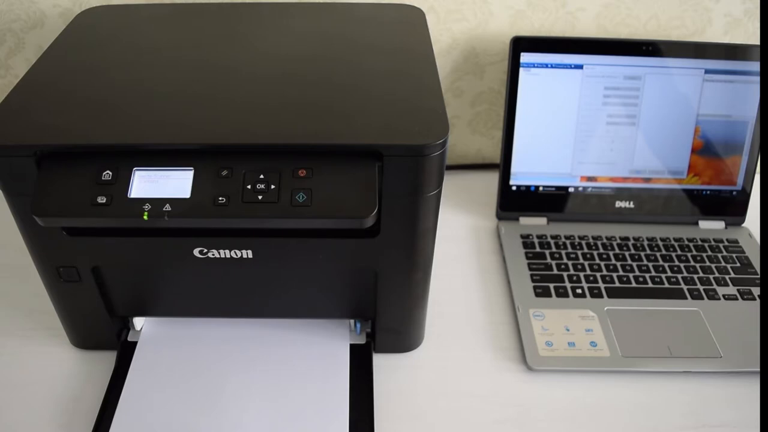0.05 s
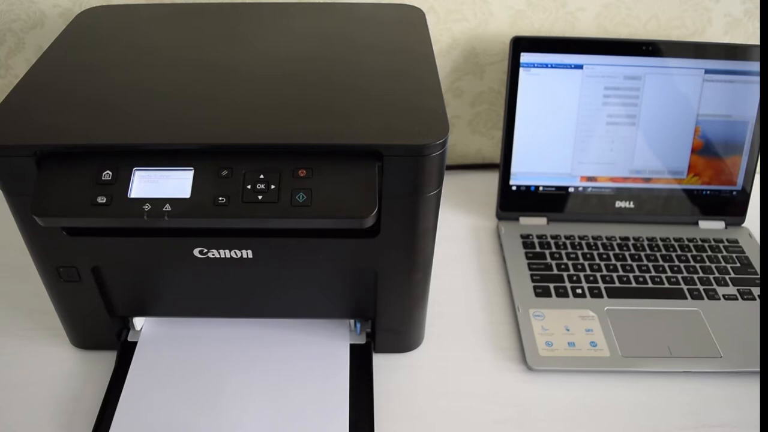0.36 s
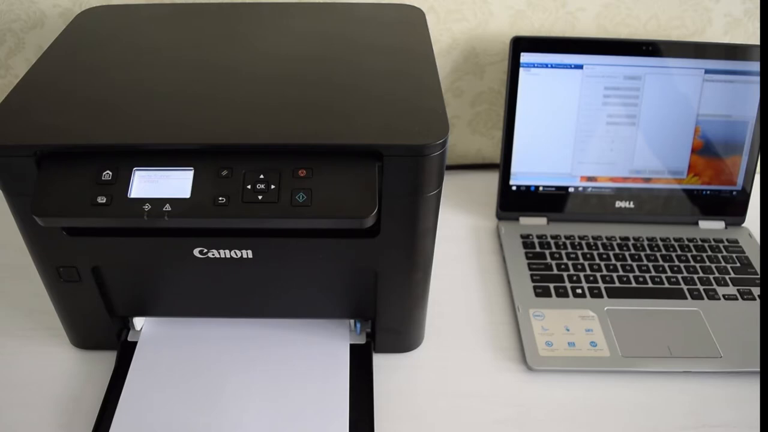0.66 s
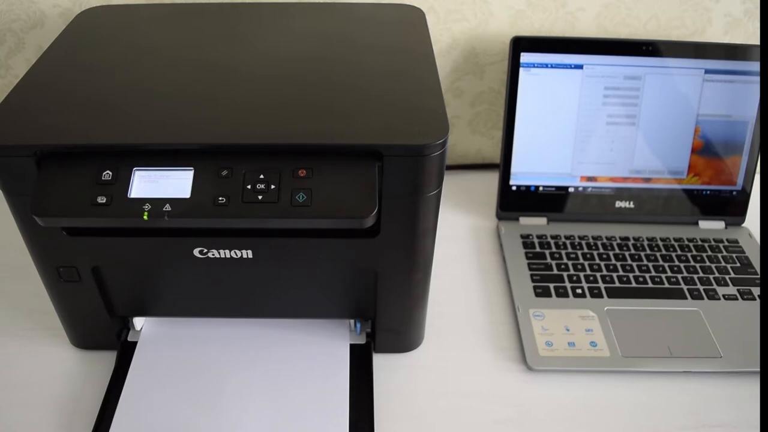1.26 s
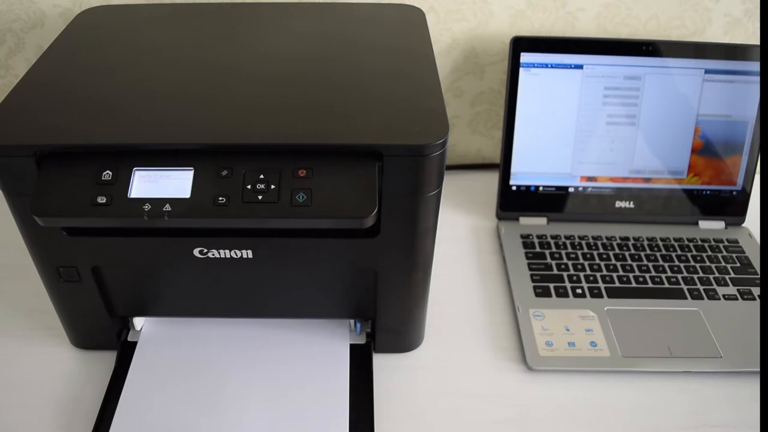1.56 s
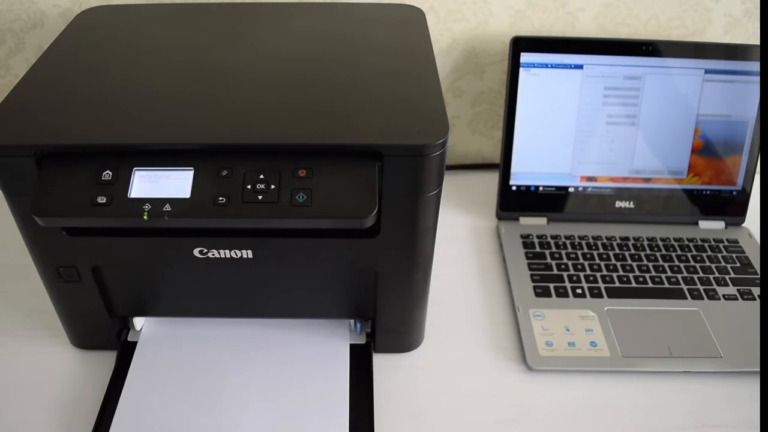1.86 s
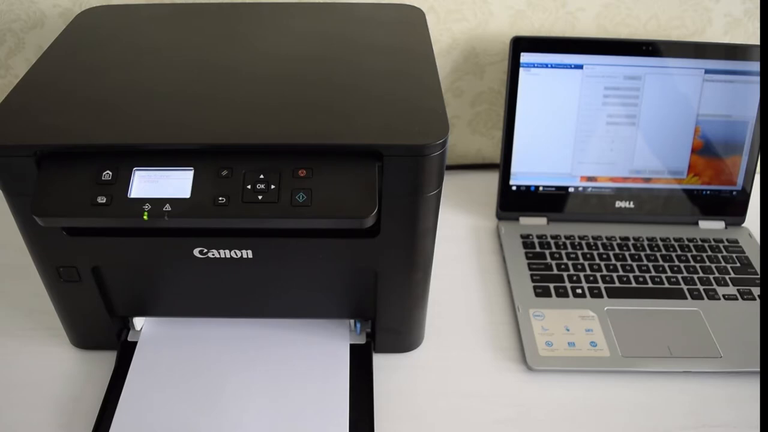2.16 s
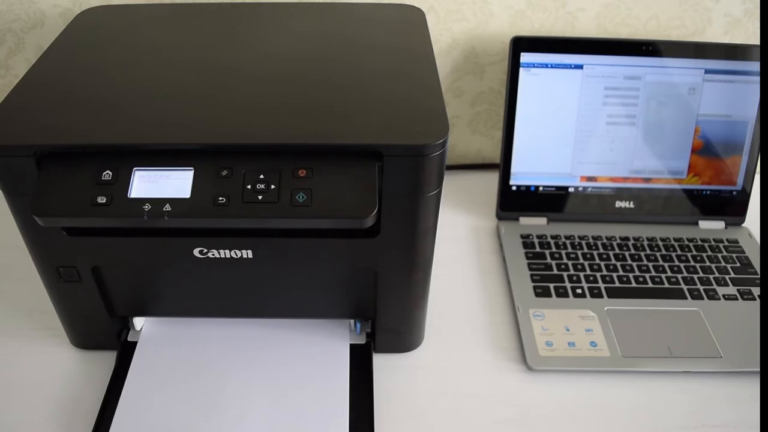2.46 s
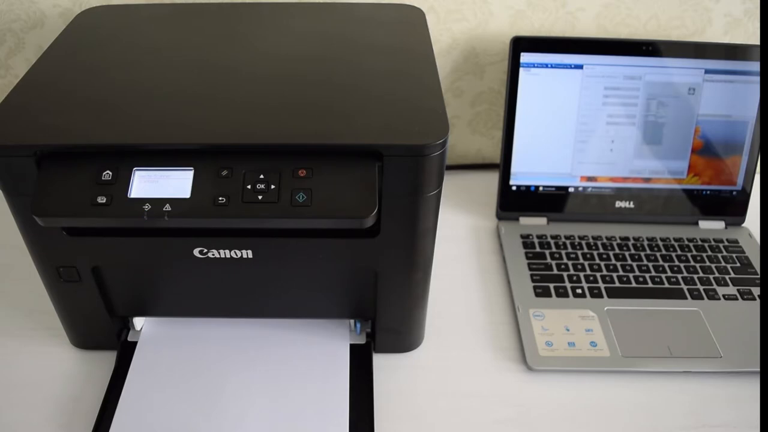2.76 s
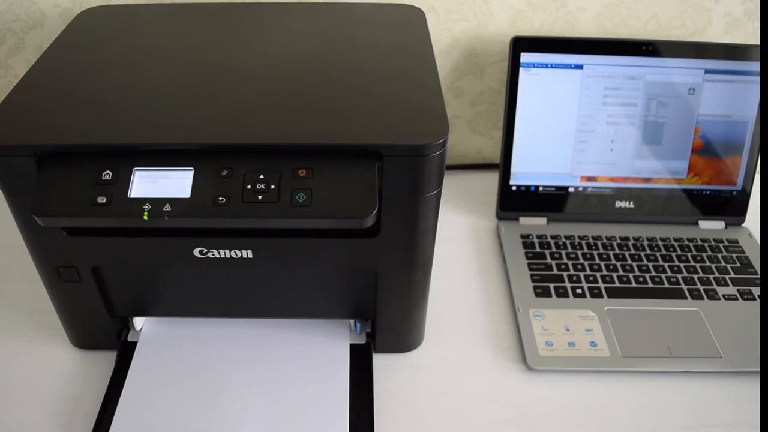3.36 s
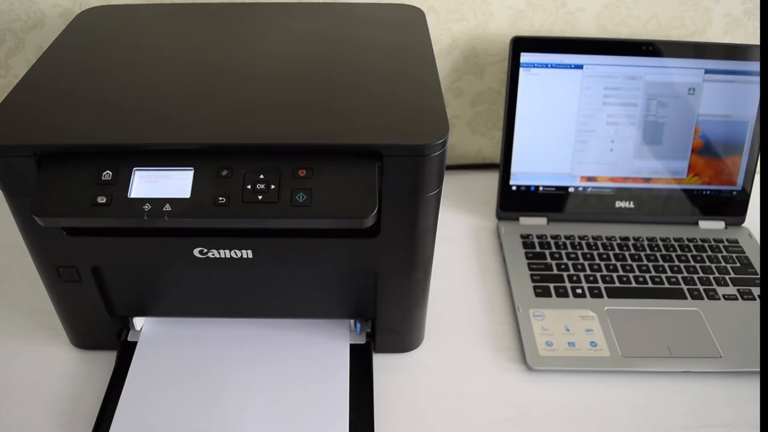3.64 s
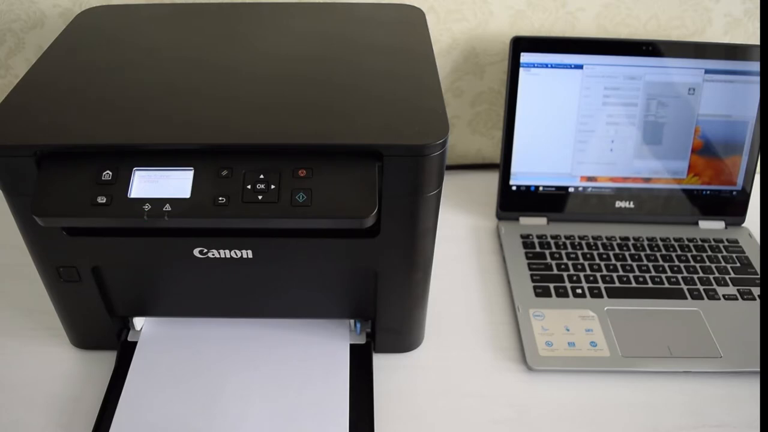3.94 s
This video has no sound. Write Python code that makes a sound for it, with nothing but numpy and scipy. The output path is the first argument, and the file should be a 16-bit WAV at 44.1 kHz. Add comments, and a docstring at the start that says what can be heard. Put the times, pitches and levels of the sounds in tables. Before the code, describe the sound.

A desktop printer-scanner's motor whines, clacks, whirs fast, then hums through two slow moves.

```python
"""In a small room, a desktop printer-scanner works through a cycle. A stepper motor whines and stops
with a clack. A fast run follows, its plastic gears whirring and throbbing once a turn, and winds down.
Then the motor hums through two slow moves, each begun by a knock of the drive in the plastic case.
The motor sounds at multiples of its step rate; the gears add tones and a rattle of tooth contacts."""
import sys
import numpy as np
from scipy import signal
from scipy.fft import rfft, irfft
from scipy.io import wavfile
from scipy.ndimage import map_coordinates

SR = 44100
rng = np.random.default_rng(int(sys.argv[2]) if len(sys.argv) > 2 else 0)


def store_pcm(level_fs):
    """Save levels as 16-bit WAV."""
    pcm = np.round(np.clip(level_fs, -1, 1) * 32767).astype(np.int16)
    wavfile.write(sys.argv[1], SR, np.atleast_2d(pcm).T)


N = 176400
T = np.arange(N) / SR
STEPS_PER_TURN = 127

# Motor speed, first run and fast run. Each row: time in seconds, step rate in Hz.
WHINE_STEP_HZ = [(0, 1006), (.243, 1007.5), (.262, 500.5)]
FAST_STEP_HZ = [(.385, 300), (.403, 480), (.46, 1469), (2.85, 1469), (2.885, 500), (2.905, 250)]
# Gear whirr early in the fast run. Each row: frequency in Hz, relative level in dB.
EARLY_WHIRR_SPECTRUM = [(100, -55), (200, -27.5), (380, -42), (450, -13.5), (540, -7), (760, -13),
                        (1050, -4.5), (1700, 1), (3300, -14), (4650, -20), (5800, -31), (8600, -29.5),
                        (11000, -40), (13500, -56)]
# Drive knocks. Each row: start in seconds, level in dB, treble gain in dB, clatter T60 in seconds.
DRIVE_KNOCKS = [(.278, -36.5, 5.5, 0.24), (.284, -38.5, -11, 0.046), (0.29, -43, -16, 0.039),
                (.377, -40, 8, 0.26), (2.891, -52, 11, 0.15), (3.018, -38, -0.5, 0.19),
                (3.462, -43.5, -20, 0.18), (3.562, -39, 4.5, 0.22), (3.703, -43, -6, .08)]
# Case modes. Each row: frequency in Hz, relative level in dB, T60 in seconds.
CASE_RESONANCES = [(514.6, -7, 0.38), (1087, 7, 0.21)]


def from_db(db):
    """Decibels to gain."""
    return 10 ** (np.asarray(db) / 20)


def unit_rms(x):
    """Scale to unit power."""
    return x / np.sqrt(np.mean(x ** 2) + 1e-20)


def curve(rows):
    """Join (seconds, value) rows by straight lines."""
    return np.interp(T, *np.transpose(rows))


def gate(start_s, stop_s, attack_s, release_s):
    """Linear rise, hold, exponential fall after stop_s."""
    return np.clip((T - start_s) / attack_s, 0, 1) * np.exp(-np.maximum(T - stop_s, 0) / release_s)


def drift(corner_hz):
    """Slow random wander, rms 1."""
    hz = np.arange(N // 2 + 1) * SR / N
    return unit_rms(irfft(rfft(rng.standard_normal(N)) / (1 + (hz / corner_hz) ** 2), N))


def coloured(mid_side, spectrum):
    """Give a mid and a side excitation the colour of the case; left and right, rms 1."""
    # Each row: frequency in Hz, side minus mid in dB.
    stereo_width = [(100, -11.5), (1000, -21.5), (2300, -14), (5000, -9.5), (9000, -6)]
    hz = np.arange(N // 2 + 1) * SR / N + 1
    gain, width = (from_db(np.interp(np.log(hz), np.log(row_hz), row_db))
                   for row_hz, row_db in (np.transpose(spectrum), np.transpose(stereo_width)))
    gain *= np.minimum(hz / spectrum[0][0], 1) ** 2
    mid, side = irfft(rfft(mid_side) * [gain, gain * width], N)
    return unit_rms(np.array([mid + side, mid - side]))


def contacts(samples=N, per_s=5000, spread_db=2.5):
    """Two trains of tiny contacts of uneven strength."""
    hits = rng.random((2, samples)) < per_s / SR
    signs = rng.choice([-1, 1], (2, samples))
    strength = from_db(spread_db * np.minimum(rng.exponential(1, (2, samples)), 4))
    return unit_rms(hits * signs * strength)


def tone(cycles, flutter_db=1.5, wobble_rad=0.14):
    """A partial that wavers in level and phase."""
    level = np.sqrt(2) * from_db(flutter_db * drift(16.5))
    return level * np.sin(2 * np.pi * (cycles + rng.random()) + wobble_rad * drift(25))


def step_harmonics(steps, harmonics):
    """Stepper tones at multiples of the step rate."""
    return sum(from_db(db) * tone(round(k) * steps, 1.1, 0.027) for k, db in harmonics)


def once_a_turn(turns, place, width):
    """A smooth swell around one place in the turn."""
    return np.exp(-(((turns - place + .5) % 1 - .5) / width) ** 2)


def room_noise():
    """The steady quiet of the room."""
    # Each row: frequency in Hz, relative level in dB.
    spectrum = [(50, -23), (100, -18), (170, -6.5), (520, -4), (2300, -2.5), (10000, -34), (14000, -45)]
    return from_db(-60) * coloured(rng.standard_normal((2, N)), spectrum)


def paper_hiss():
    """A brief bright hiss, probably sliding paper, late in the second slow move."""
    # Each row: frequency in Hz, relative level in dB.
    spectrum = [(4000, -18), (7300, 10), (9700, -13), (13000, -35)]
    return from_db(-64) * gate(3.83, 3.92, 0.022, 0.022) * coloured(contacts(), spectrum)


def squeak(pitch_hz=3600):
    """A thin squeak and some rubbing just before the fast run."""
    rubbing = from_db(-44.5) * coloured(contacts(), EARLY_WHIRR_SPECTRUM)
    squeal = from_db(-49.5) * tone(pitch_hz * T + 0.1 * drift(80), flutter_db=5.0, wobble_rad=0.34)
    return gate(0.297, 0.363, 0.017, 0.018) * (squeal + rubbing)


def judder(echo_decay_s=0.01):
    """Speed changes glide at twice the step rate, smeared by the case; the fast run's stop rings on."""
    # Each row: start in seconds, end in seconds, level in dB.
    judders = [(0.242, 0.257, -37), (0.399, 0.445, -40.5), (2.856, 2.91, -42)]
    step_hz = np.where(T < DRIVE_KNOCKS[0][0], curve(WHINE_STEP_HZ), curve(FAST_STEP_HZ))
    level = sum(from_db(db) * gate(start_s, end_s, .005, 0.012) for start_s, end_s, db in judders)
    glide = level * np.sin(4 * np.pi * np.cumsum(step_hz) / SR + .5 * drift(130))
    echoes = rng.standard_normal(N) * np.exp(-T / echo_decay_s)
    glide += signal.fftconvolve(glide, echoes / np.linalg.norm(echoes))[:N]
    ring = from_db(-51.5) * gate(2.89, 2.946, 0.02, 0.13) * tone(CASE_RESONANCES[0][0] * T, 3.0)
    return signal.sosfilt(signal.butter(2, 330, "high", fs=SR, output="sos"), glide) + ring


def knocks(rise_s=0.0036, treble_hz=3930):
    """The drive takes up its slack: plastic parts clatter and the case rings."""
    # Each row: frequency in Hz, relative level in dB.
    spectrum = [(170, -25), (500, -13), (1200, -1), (2000, -2), (3000, -11.5), (4500, -18), (6000, -26),
                (8500, -22.5), (10500, -30), (14000, -59)]
    noise = coloured(rng.standard_normal((2, N)), spectrum)
    treble = signal.sosfiltfilt(signal.butter(2, treble_hz, "high", fs=SR, output="sos"), noise)
    out = 0
    for start_s, db, treble_db, t60_s in DRIVE_KNOCKS:
        envelope = gate(start_s, start_s + rise_s, rise_s, t60_s / np.log(1000))
        knock = envelope * (noise + (from_db(treble_db) - 1) * treble)
        for hz, mode_db, mode_t60_s in CASE_RESONANCES:
            decay = gate(start_s, start_s, 2 * rise_s, mode_t60_s / np.log(1000))
            knock += from_db(mode_db - 9.5) * decay * np.sin(2 * np.pi * hz * (T - start_s))
        out += from_db(db) * knock
    return out


def slow_moves(step_hz=331.9, build_up_s=0.11):
    """Two moves that hum and rattle, the second under more load; overtones build up sooner."""
    # Each entry: multiple of the step rate; its level in dB under light load; under heavy load.
    multiples = [1, 2, 3, 4, 5, 6, 7, 8, 12, 16, 25, 29]
    light_levels_db = [-49.5, -57, -57.5, -56, -64, -63, -70, -50.5, -65.5, -73.5, -77.5, -83]
    heavy_levels_db = [-45.5, -56.5, -47.5, -80, -58.5, -62, -59, -50.5, -66, -72, -76, -83]
    # Rattle. Each row: frequency in Hz, relative level in dB.
    light_spectrum = [(100, -29), (180, -13.5), (520, 0), (1800, -1.5), (2800, -12), (9500, -28.5),
                      (14000, -39)]
    heavy_spectrum = [(100, -34), (180, -17), (400, -12), (530, -3), (1080, 0.5), (2400, -7.5), (3600, -18),
                      (9500, -24), (14000, -57)]
    hum = 0
    for k, light_db, heavy_db in zip(multiples, light_levels_db, heavy_levels_db):
        rise_s, fall_s = build_up_s / np.sqrt(k), 0.068 / k
        light = from_db(light_db) * gate(3.022, 3.44, rise_s, fall_s)
        heavy = from_db(heavy_db) * gate(3.565, 3.982, rise_s, fall_s)
        hum += (light + heavy) * tone(k * step_hz * T, flutter_db=0.43, wobble_rad=0.045)
    light_rattle = from_db(-55) * gate(3.02, 3.47, 0.015, 0.059) * coloured(contacts(), light_spectrum)
    heavy_level = from_db(-47.5 + drift(30)) * gate(3.563, 3.99, 0.014, 0.033)
    return hum + light_rattle + heavy_level * coloured(contacts(), heavy_spectrum)


def first_run():
    """A piercing stepper whine over light gear rattle; both die away as the motor brakes."""
    # Each row: time in seconds, level in dB.
    whine_db = [(0, -35), (.062, -34.5), (.14, -39.5), (.2, -36), (.25, -38.5)]
    # Each row: multiple of the step rate, relative level in dB.
    harmonics = [(1, -12), (2, 0.5), (4, -31.5), (7, -39), (10, -40.5)]
    # Each row: frequency in Hz, relative level in dB.
    rattle_spectrum = [(100, -35), (280, -21), (1250, -4.5), (2200, -0.5), (2700, -9.5), (4000, -17.5),
                       (6000, -29.5), (11000, -39), (14000, -53)]
    whine = from_db(curve(whine_db)) * step_harmonics(WHINE_STEP_HZ[0][1] * T, harmonics)
    rattle = from_db(-46.5) * coloured(contacts(), rattle_spectrum)
    return gate(-0.89, 0.249, 1, 0.011) * whine + gate(-1.3, 0.275, 1, 0.025) * rattle


def fast_motor(steps):
    """Stepper tones of the fast run: step rate, octave and faint overtones."""
    # Each row: time in seconds, level in dB.
    fundamental_db = [(.5, -53.5), (1.25, -48), (1.5, -56.5), (2.03, -55.5), (2.25, -50), (2.85, -49)]
    octave_db = [(.55, -55.5), (.95, -61), (2.6, -67.5), (2.8, -55)]
    # Each row: multiple of the step rate, level in dB.
    overtones = [(4, -77.5), (6, -78.5), (7, -76), (8, -83.5), (10, -82.5)]
    fundamental = from_db(curve(fundamental_db)) * tone(steps, flutter_db=1.0, wobble_rad=0.13)
    octave = from_db(curve(octave_db)) * tone(2 * steps)
    return fundamental + octave + step_harmonics(steps, overtones)


def gear_tones(turns, progress, mesh_per_turn=90, chirp_per_turn=397):
    """Meshing gears sing; uneven teeth make the main mesh throb, and one spot rubs and chirps."""
    # Each entry: cycles per turn; level in dB early in the run; late in the run.
    cycles_per_turn = [18, 36, 45, 54, 89, 96, 108, 117, 141, 153, 172, 180, 202]
    early_db = [-95, -65, -56.5, -62.5, -61, -72, -55, -65, -48.5, -52, -52, -53.5, -56]
    late_db = [-68.5, -62.5, -58, -65, -57.5, -56, -55.5, -61, -60, -61, -60.5, -61, -61]
    # Each row: time in seconds, level in dB before the throb.
    mesh_db = [(.5, -66), (1.45, -54), (2.05, -48.5), (2.85, -46.5)]
    # Each row: place and width, both in turns.
    tight_spots = [(.44, .22), (.71, .035), (.955, .05)]
    gears = sum(from_db(early + (late - early) * progress) * tone(k * turns, k / 90, k / 500)
                for k, early, late in zip(cycles_per_turn, early_db, late_db))
    swells = sum(from_db(drift(9.5)) * once_a_turn(turns, *spot) for spot in tight_spots)
    throb = unit_rms(0.32 + swells)
    chirp = from_db(-63) * once_a_turn(turns, 0.32, 0.15) * tone(chirp_per_turn * turns, wobble_rad=.3)
    mesh = from_db(curve(mesh_db)) * throb * tone(mesh_per_turn * turns, -1.5, 0.56)
    return gears + mesh + chirp


def gear_whirr(turns, progress, repeat_share=0.69):
    """The same tooth contacts return every turn, among chance ones; the whirr darkens, then coasts out."""
    # Each row: frequency in Hz, relative level in dB.
    late_spectrum = [(100, -40), (200, -35), (370, -26), (450, -4), (560, -6), (760, -13), (1080, 1),
                     (1400, -9), (2300, -5.5), (3300, -16), (4650, -19.5), (5800, -31.5), (8600, -30),
                     (11000, -40.5), (13500, -60)]
    coast_spectrum = [(250, -22.5), (470, 1), (700, -12), (1010, -2.5), (1400, -15.5), (2870, -22),
                      (10000, -42.5), (14000, -67)]
    one_turn = contacts(samples=3812)
    teeth = np.array([map_coordinates(train, [turns % 1 * len(train)], order=3, mode="grid-wrap")
                      for train in one_turn])
    rattle = np.sqrt(repeat_share) * unit_rms(teeth) + np.sqrt(1 - repeat_share) * contacts()
    early = (1 - progress) * from_db(-40) * coloured(rattle, EARLY_WHIRR_SPECTRUM)
    late = progress * from_db(-42.5) * coloured(rattle, late_spectrum)
    coast = from_db(-42.5) * gate(2.86, 2.923, 0.039, 0.1) * coloured(contacts(), coast_spectrum)
    return gate(0.38, 2.885, 0.047, 0.032) * (early + late) + coast


def fast_run():
    """Motor and gears speed up, hold and brake together."""
    steps = np.cumsum(curve(FAST_STEP_HZ)) / SR
    turns = steps / STEPS_PER_TURN
    progress = curve([(.6, 0.086), (2.7, 0.98)])   # blend from early to late timbre
    tones = gear_tones(turns, progress) + fast_motor(steps)
    return gate(0.41, 2.855, 0.036, 0.015) * tones + gear_whirr(turns, progress)


def scene():
    """The whole cycle over the quiet of the room."""
    return (room_noise() + first_run() + fast_run() + judder() + slow_moves()
            + knocks() + squeak() + paper_hiss())


def record(dry):
    """Steep low-pass at 15 kHz."""
    return signal.sosfilt(signal.ellip(10, .1, 80, 15000, fs=SR, output="sos"), dry)


dry = scene()
out = record(dry)
store_pcm(out)
```